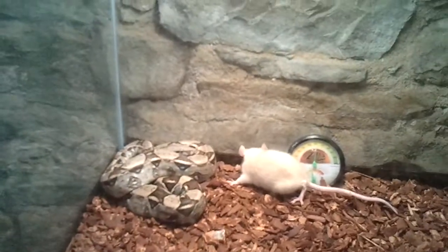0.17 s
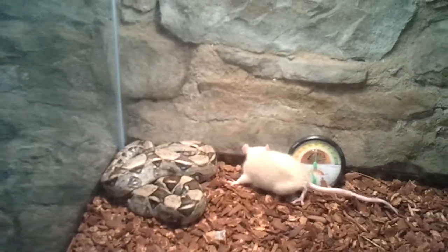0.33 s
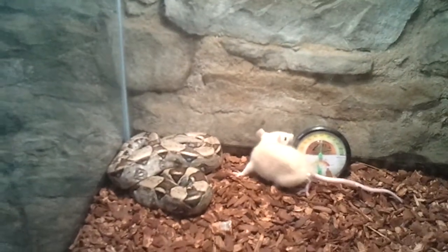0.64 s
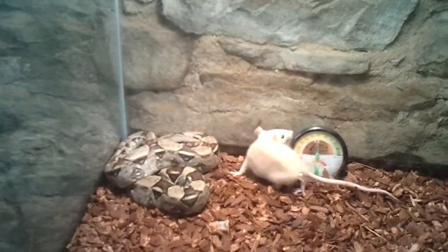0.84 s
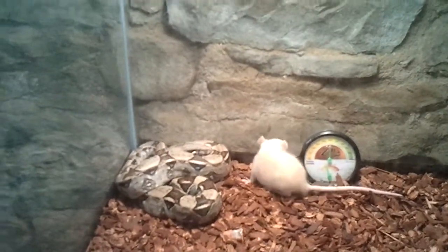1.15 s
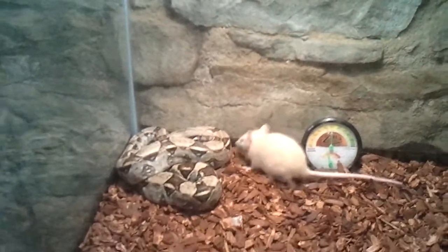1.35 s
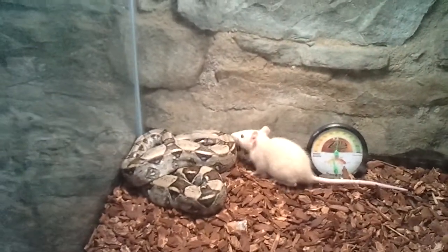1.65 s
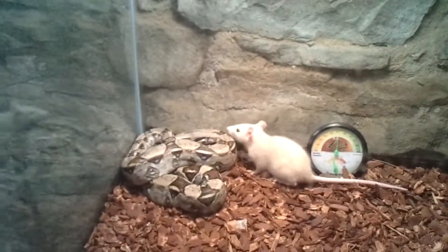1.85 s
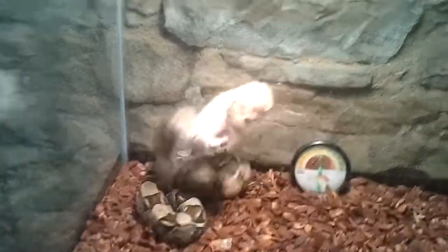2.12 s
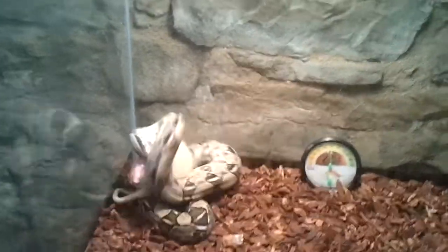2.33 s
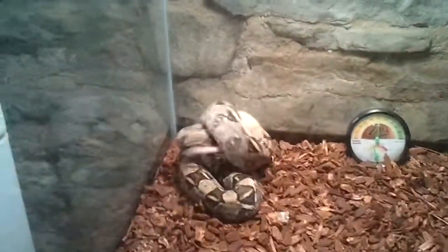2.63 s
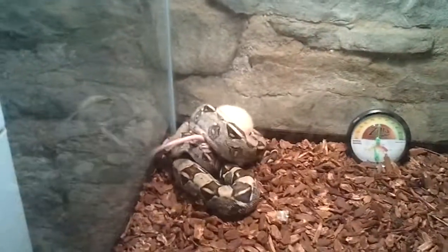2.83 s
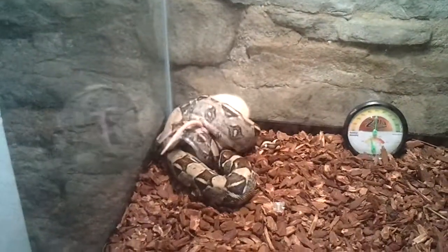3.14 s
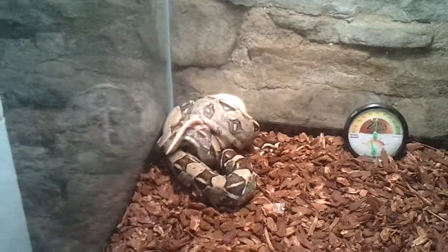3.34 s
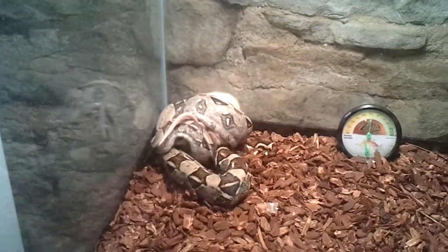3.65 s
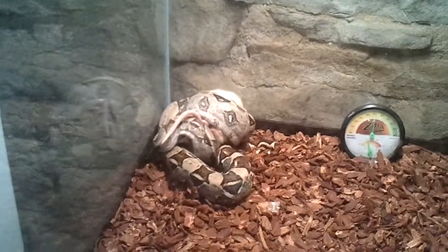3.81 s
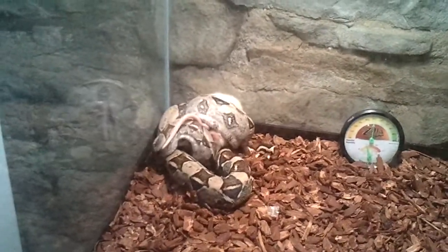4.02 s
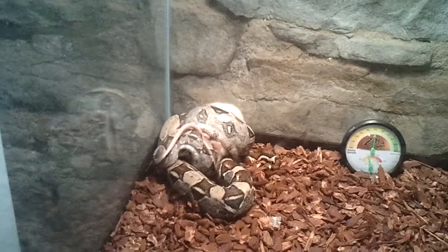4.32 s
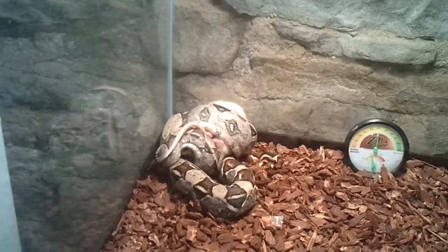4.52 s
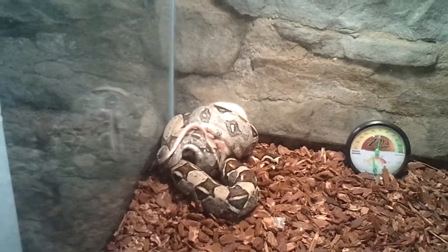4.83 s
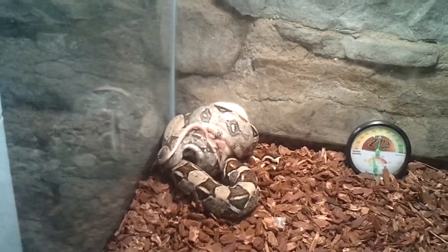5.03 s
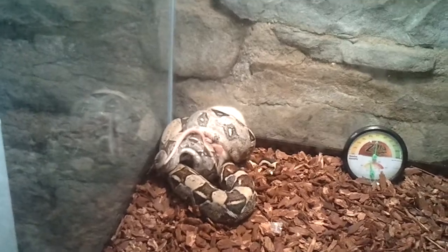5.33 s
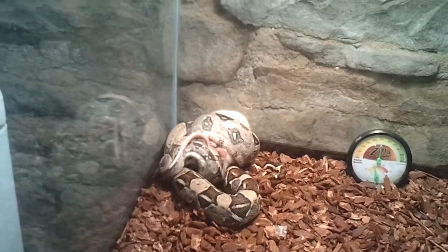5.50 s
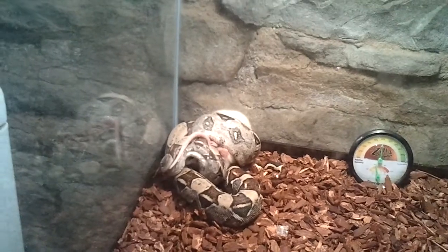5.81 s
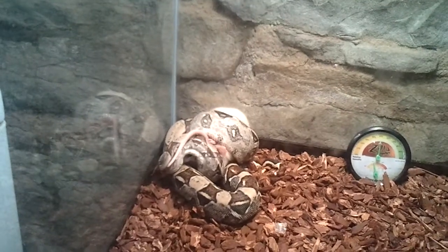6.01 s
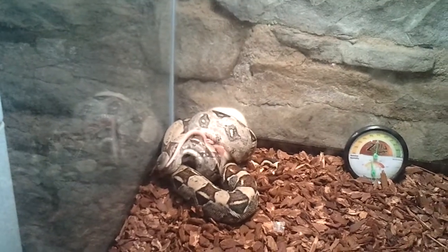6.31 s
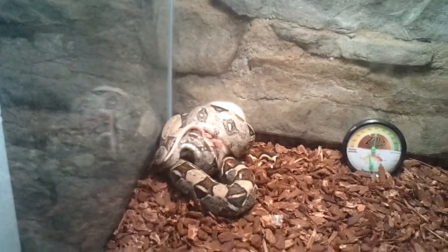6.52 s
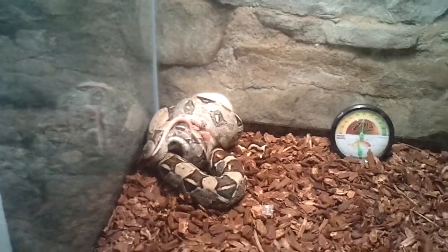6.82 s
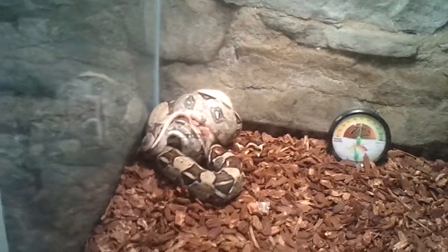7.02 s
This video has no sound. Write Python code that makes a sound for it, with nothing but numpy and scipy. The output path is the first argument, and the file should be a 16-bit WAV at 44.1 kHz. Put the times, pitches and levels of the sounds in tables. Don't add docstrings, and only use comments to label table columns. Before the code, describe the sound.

A seized rat squeals and screams in a small glass enclosure, weakening to a hoarse wheeze over steady hum, with one loud dry click near the end.

```python
import sys
import numpy as np
from scipy import signal
from scipy.fft import rfft, irfft, next_fast_len
from scipy.io import wavfile
from scipy.ndimage import uniform_filter1d, minimum_filter1d

SR = 44100
rng = np.random.default_rng(int(sys.argv[2]) if len(sys.argv) > 2 else 0)


def dump_mix(stems):
    frames = np.atleast_2d(stems).T
    limited = np.clip(frames, -1, 1)
    pcm = np.round(limited * 32767).astype(np.int16)
    wavfile.write(sys.argv[1], SR, pcm)


def boost(x):
    u = np.asarray(x, float) / 20
    return 10 ** u


N = 315756
TIME_S = np.arange(N) / SR
MAINS_HZ, SAMPLING_HZ = 60, 16000

# (frequency [Hz], level [dB rms])
BUZZ_LINES = [(118.4, -68.5), (360.7, -63.5), (479.1, -71), (597.5, -68), (721.4, -76.5), (839.8, -68.5),
              (958.2, -64), (1023, -77.5), (1082, -79), (1200, -75.5), (1319, -77.5), (1378, -76),
              (1437, -76.5), (240, -75),
              (3122, -78.5), (3359, -77), (3418, -74.5), (4317, -75.5), (4382, -74.5), (4619, -73.5),
             (4678, -75), (4737, -77), (4802, -70), (4861, -73), (5222, -76), (5642, -80), (5879, -76.5),
             (6239, -77)]
# (frequency [Hz], level [dB rms])
FAINT_BUZZ = [(100, -89.5), (700, -89.5), (1100, -86), (1700, -92), (3000, -92.5), (4500, -93), (6000, -89),
              (8500, -95.5)]
# (frequency [Hz], density [dB per Hz])
HISS = [(18, -54), (30, -24.5), (113, -10.5), (340, -5.5), (1000, -10.5), (1900, -13.5), (4200, -15),
        (7900, -13)]
# (frequency [Hz], gain [dB])
HISS_EDGE = [(7900, 0), (8690, -20.5), (11300, -41), (19100, -107)]
HISS_TOP = [(hz, db + HISS[-1][1]) for hz, db in HISS_EDGE[1:]]
HISS_DB, STILL_HAND_DB = -54, -81
# (time [s], level [dB], swell [s])
HAND_JOLTS = [(0.48, -64, .05), (1.36, -66, 0.056), (1.95, -74, .08), (2.28, -61, 0.076), (2.42, -63, .08),
              (2.56, -66, .05), (2.77, -48.5, .04), (3.06, -65, 0.087), (3.49, -49, 0.04),
              (3.62, -64.5, .06), (3.95, -70, .12), (4.6, -75, .08), (5.9, -76, .2), (6.35, -77, .08),
              (6.82, -66, .06)]

# (start [s], length [s], level [dB])
BARK_DRAGS = [
    (1.22, .07, -60.5),
    (1.298, 0.022, -50),
    (1.335, 0.071, -56.5),
    (2.163, 0.16, -48.5),
    (2.34, 0.023, -44),
    (2.415, .04, -50),
    (2.538, .05, -48),
]
# (frequency [Hz], level [dB])
BARK_SPECTRUM = [(250, -5), (600, -4.5), (1300, -3.5), (2500, -8.5), (4500, -7), (6500, -0.5), (8000, -17)]
DRAG_RISE_S, DRAG_FALL_S = .012, .03

# (time [s], snap peak [dB], knock peak [dB], knock centre [Hz])
CLICKS = [(1.2965, -42, -50, 1300), (1.307, -43, -60, 1300), (1.3155, -36, -50, 1300),
          (1.3455, -52, -37, 1300), (3.692, -47, -43, 2000), (4.2718, -42, -33, 1000),
          (6.8195, -35, -50, 1300), (6.8243, -36, -60, 1300), (6.8263, -23, -30, 2000),
          (6.8276, -17.5, -20.5, 850), (2.4528, -27, -23, 2000), (2.4555, -26, -30, 2000),
          (2.4125, -36, -34, 1300), (2.297, -48, -38, 1600), (2.578, -48, -38, 1200)]
# (frequency [Hz], level [dB], t60 [s])
SNAP_MODES = [(3100, -7, .002), (4250, 5, .0025), (4700, 3, .002), (5550, 1, .0015), (6350, 4, .002),
              (7050, 1, .0015), (7650, 0, .002), (8300, -12, .002)]
# (frequency [Hz], level [dB], t60 [s])
KNOCK_MODES = [(180, -8, 0.015), (800, 2, 0.008), (1360, 5.5, 0.0036), (1940, 7, 0.0036)]

# (time [s], peak [dB], blow centre [Hz], push length [s])
BUMPS = [
    (2.173, -39.5, 146, 0.011),
    (2.178, -37.5, 800, 0.0027),
    (2.322, -37, 340, 0.005),
    (2.344, -33.5, 473, 0.019),
    (2.411, -29, 800, 0.0026),
    (2.453, -22, 637, 0.012),
    (2.57, -35.5, 940, 0.0084),
    (2.583, -44.5, 403, 0.021),
]
# (frequency [Hz], level [dB], t60 [s])
PANE_MODES = [(146, 2.5, 0.32), (196, 3, 0.3), (280, -5, 0.077), (387, 1, 0.2), (469.6, -4, 0.066),
              (587.5, 0, 0.11), (660, -9, 0.12), (802, -5.5, 0.13), (1060, -8.5, 0.047), (1396, 5.5, 0.045),
              (2205, 5.5, .05)]

# (time [s], pitch [Hz], effort [dB], rasp over whistle [dB], bright over dull rasp [dB])
SEIZED = [
    [(2.225, 3360, -48, 8, -10), (2.24, 3210, -50, -5, 4), (2.262, 3450, -46.5, -10, 19),
     (2.272, 3000, -48, 1, 5), (2.285, 2704, -43, 1, 6), (2.297, 2700, -45, -2, -12),
     (2.31, 3400, -48, -13, 8), (2.322, 3400, -48, -3, 0.1)],
    [(2.331, 3900, -37.5, -2, -3), (2.338, 3703, -34.5, -3, -12), (2.343, 3060, -35.5, -7, -2),
     (2.368, 3120, -40, -6, -5), (2.395, 3060, -61, 4, 1)],
    [(2.407, 3683, -30.5, -18, -6), (2.412, 3551, -36.5, -4, -4), (2.424, 3152, -30, -2.5, -4),
     (2.437, 3030, -40, -5, 0), (2.45, 3099, -42, 3, -4), (2.457, 3144, -33, -4, -5),
     (2.472, 3100, -51, 4, -6), (2.49, 2850, -50, 6, 3)],
]
SCREAMS = [
    [(2.527, 3000, -47, 16, -8), (2.54, 2995, -40, 2, 13), (2.555, 3300, -31, 0.5, 0),
     (2.572, 3500, -37, 1.5, 0), (2.59, 3000, -57, 11, -10), (2.61, 3002, -55, 17, 6)],
    [(2.694, 3290, -42, 22, -3), (2.709, 3300, -27.5, 9.1, 7), (2.722, 3400, -18.5, 8.8, 6),
     (2.742, 3700, -17.5, 1, 6), (2.757, 4600, -15, 1.4, -1.5), (2.772, 4950, -15.5, 0.1, -1),
     (2.786, 4600, -15.5, 0.82, -0.5), (2.8, 4700, -27.5, 17, -2), (2.825, 5022, -37, 6, 14)],
    [(2.937, 4600, -40, 10, 0.1), (2.948, 4650, -26.5, 1.5, 1.5), (2.97, 4715, -22, 1.5, 6.5),
     (2.99, 4620, -25, 0.5, 2), (3.012, 4660, -21.5, -3, 1.5), (3.035, 4620, -27.5, 7, -0.5),
     (3.12, 4610, -30, 8, -1.5), (3.138, 4500, -37, 19, -1), (3.155, 4400, -53, -3, -9)],
]
GRIPPED = [
    [(3.342, 2400, -44, -4, -2), (3.35, 2900, -48, 13, -10), (3.36, 2700, -47, 4, -13),
     (3.37, 2700, -64, 8, 0.1)],
    [(3.462, 3550, -37, -15, 0.1), (3.468, 3500, -40.5, -2, 10), (3.478, 3070, -43, -16, 3.1),
     (3.49, 3390, -41.5, -18, 3), (3.52, 3490, -38, -0.5, 3.2), (3.53, 3240, -42.5, -15, 2),
     (3.556, 3370, -39, -6, 0.1), (3.563, 3880, -35, -10, 6)],
    [(3.565, 3880, -38, -1, 1), (3.59, 3800, -34.5, 1, -2), (3.603, 4400, -33.5, 3.5, -7),
     (3.62, 4650, -31, 8, -4), (3.642, 4400, -30.5, 19, -12), (3.655, 4300, -56, 6, -11),
     (3.675, 4296, -62, 2, 4)],
]
WEAKER = [
    [(3.836, 3400, -51, 18, -1), (3.846, 3101, -44, -5, -3), (3.862, 2850, -40, 9, -5),
     (3.895, 2950, -34, 5, -5), (3.92, 2850, -37.5, 16, -5), (3.972, 3000, -41.5, 13, -5),
     (3.99, 3000, -49, 6, -6)],
    [(4.0, 3400, -52, 5, -5), (4.02, 3900, -47, 18, -5), (4.032, 3900, -39.5, 0, -1),
     (4.05, 3560, -42.5, -1, -5), (4.066, 3100, -38.5, 5, -13), (4.082, 2975, -50, 17, -12),
     (4.092, 3200, -57, 2, -3)],
]
LAST = [
    [(4.716, 3250, -58, -2, -2), (4.728, 3020, -50, -4, 1), (4.742, 2930, -41, -13, 1),
     (4.762, 2920, -43, -8, -4), (4.773, 2900, -44, -6, 4), (4.779, 3340, -41, -1, 10),
     (4.792, 3300, -40, 5, 4), (4.797, 3250, -39, 14, 4)],
    [(4.798, 1260, -39, 14, 5), (4.81, 1240, -37.5, 14, 3), (4.842, 1200, -38.5, 13, 2),
     (4.852, 1400, -38.5, 14, 6), (4.877, 1300, -40, 17, -1), (4.888, 1300, -56, 10, 0.1)],
]
# (roughness [0-1], overtone over whistle [dB], chest over rasp [dB])
VOICES = [(0.84, -12, -8.5), (0.4, -7, -3), (0.9, -2, -3.5), (.95, -8, -12), (0.99, -35, -19.5),
          (0.84, -38, -13), (0.85, -12, -2.5), (0.53, -8, -12.5), (0.45, -13, -11.5), (0.83, -12, -10),
          (0.73, -6, -9), (0.63, -9, -14), (0.53, -10, -18)]
ROUGH_PER_LEAK_DB, ROUGH_PER_FADE_DB = .012, .006
OVERTONE_PER_GAPE = 0.94
# (frequency [Hz], level [dB])
DULL_RASP = [(1900, -24), (2300, -6), (2900, -3), (3600, 0), (4500, 1), (5200, -0.5), (5800, 2.5),
             (6400, -25)]
# (frequency [Hz], level [dB])
BRIGHT_RASP = [(5100, -40.5), (5800, 7), (7000, 9), (7800, 5.5), (8600, -9.5)]
# (frequency [Hz], width [Hz], level [dB])
THROAT_RIDGES = [(2380, 100, -0.7), (2920, 230, -4), (4560, 300, -4)]
# (frequency [Hz], level [dB])
FREE_CHEST = [(220, -36), (340, -15), (520, -8.5), (850, -2), (1250, -6), (1900, -1), (2200, -4),
              (2600, -27.5)]
# (frequency [Hz], level [dB])
SQUEEZED_CHEST = [(220, -30), (340, -10), (550, -8.5), (880, -3), (1150, -8), (1500, -3), (1850, -10),
                  (2300, -21.5)]
GRIPPED_S, RASP_DB = 3.3, -1
# (start [s], length [s], from [Hz], to [Hz], level [dB rms])
STRANDS = [(2.255, 0.035, 7200, 5700, -58.2), (2.273, 0.024, 2900, 2650, -45.6),
           (2.33, 0.035, 5800, 6400, -45.9), (2.33, 0.015, 3900, 3700, -41.1),
           (2.407, 0.014, 7400, 7300, -44.3), (2.43, 0.026, 6200, 6100, -42.7),
           (2.45, 0.014, 2100, 2000, -42.7), (2.7, 0.045, 1850, 1950, -39.8),
           (2.755, 0.045, 1900, 1900, -38.8), (2.716, 0.03, 6900, 6800, -29.9),
           (2.728, 0.028, 3450, 3600, -28.2), (2.76, 0.024, 5090, 5090, -16.6),
           (2.764, 0.026, 4490, 4490, -22.8), (2.764, 0.018, 950, 950, -42.2),
           (2.944, 0.028, 1400, 1400, -42.9), (2.95, 0.026, 6500, 6550, -32.9),
           (2.99, 0.042, 7050, 7050, -33.0), (2.98, 0.14, 1940, 1940, -50.2), (2.96, 0.12, 880, 850, -45.3),
           (3.86, 0.11, 4600, 4500, -48.2), (3.855, 0.105, 2900, 2880, -44.4),
           (3.9, 0.05, 2420, 2400, -48.0), (3.86, 0.09, 940, 930, -51.0), (4.028, 0.016, 3880, 3750, -45.2),
           (4.042, 0.015, 5290, 5290, -47.9), (4.04, 0.027, 7100, 7030, -52.3),
           (4.058, 0.015, 1380, 1380, -51.4), (4.068, 0.018, 4300, 4300, -48.3),
           (4.722, 0.05, 6300, 5800, -65.6), (4.769, 0.027, 6100, 7050, -45.7),
           (4.797, 0.088, 7150, 7300, -48.1), (4.785, 0.065, 4900, 4860, -49.4),
           (4.79, 0.06, 2420, 2400, -58.8), (4.85, 0.036, 2700, 3000, -52.4)]
STRAND_WIDTH_HZ, STRAND_ROUGH, STRAND_EDGE_S, STRANDS_DB = 170, .65, .007, -0.5
# (time [s], gain over voice [dB])
HARD_SLAPS = [(2.7171, 6.5), (2.721, 1.5), (2.7268, 4.5), (2.7315, 2.5), (2.7377, 5), (2.7466, 11),
              (2.7588, 3), (2.7678, 8), (2.773, 7), (2.783, 9.5), (2.7858, 2.5), (2.7913, 5), (2.8127, 6),
              (2.818, 4), (2.9516, 1.5), (2.966, 6.5), (2.9719, 4), (2.9796, 4.5), (2.9852, 4), (3.0023, 3),
              (3.0092, 3), (3.0274, 4.5), (3.0337, 5), (3.0376, 2)]
SLAP_S = .0006

# (frequency [Hz], t60 [s])
GLASS_T60 = [(300, 0.31), (1500, 0.13), (3200, 0.15), (5000, 0.17), (8000, 0.12)]
# (frequency [Hz], level [dB], t60 [s])
STANDING_WAVE = [(5085, 0, .16)]
LIMIT_PEAK, OVERLOAD_PEAK = .724, .71


def evened(x):
    return x / np.sqrt(np.mean(x ** 2) + 1e-20)


def read(points, hz):
    f, value = np.transpose(points)
    return np.interp(np.log(hz + 1), np.log(f + 1), value)


def colour(x, points):
    size = next_fast_len(len(x))
    gain = boost(read(points, np.fft.rfftfreq(size, 1 / SR)))
    return evened(irfft(rfft(x, size) * gain, size)[:len(x)])


def drift(seconds):
    size = max(int(seconds * SR), 1)
    once = uniform_filter1d(rng.standard_normal(N), size)
    return evened(uniform_filter1d(once, size))


def buzz():
    k = np.arange(2, 141)
    db = read(FAINT_BUZZ, k * MAINS_HZ) + 6.54 * rng.standard_normal(len(k))
    for hz, line_db in BUZZ_LINES:
        db[round(hz / MAINS_HZ) - 2] = line_db
    period_s = TIME_S[:SR // MAINS_HZ]
    turns = np.outer(k * MAINS_HZ, period_s) + rng.random((len(k), 1))
    cycle = boost(db) @ np.cos(2 * np.pi * turns)
    return np.sqrt(2) * np.resize(cycle, N) * boost(.7 * drift(.2))


def floor():
    hiss_db = HISS_DB - 2.5 + 0.17 * drift(.15)
    hiss = boost(hiss_db) * colour(rng.standard_normal(N), HISS + HISS_TOP)
    rumble = colour(rng.standard_normal(N), [(20, -14.0), (35, -5), (60, 0), (90, 0.0), (140, -30.0)])
    s, db, swell_s = np.transpose(HAND_JOLTS)[:, :, None]
    t = TIME_S[::64]
    jolts = (boost(db) * np.exp(-.5 * ((t - s) / swell_s) ** 2)).sum(0)
    hand = boost(STILL_HAND_DB) + np.interp(TIME_S, t, jolts)
    return hiss + boost(-6.5) * hand * rumble


def bark():
    start_s, length_s, db = np.transpose(BARK_DRAGS)[:, :, None]
    t = TIME_S[::64] - start_s
    rise = np.minimum(t / DRAG_RISE_S, 0)
    fall = np.maximum(t - length_s, 0) / DRAG_FALL_S
    drags = boost(db) * np.exp(rise - fall)
    sizes = (rng.random(N) < 1500 / SR) * boost(3.0 * np.minimum(rng.exponential(1, N), 4))
    bursts = signal.lfilter([1], [1, -np.exp(-1 / (0.0011 * SR))], sizes)
    grains = bursts * rng.standard_normal(N)
    return np.interp(TIME_S, TIME_S[::64], drags.max(0)) * colour(grains, BARK_SPECTRUM)


def ring(modes, weight=1, rise_s=1e-4, phase=0):
    hz, db, t60_s = np.transpose(modes)[:, :, None]
    t, rise_s = TIME_S[:12000], max(rise_s, 1e-4)
    dying = boost(db - 60 * np.maximum(t - rise_s, 0) / np.maximum(t60_s, .001))
    sines = np.sin(2 * np.pi * (hz * t + phase))
    return np.minimum(t / rise_s, 1) * (weight * dying * sines).sum(0)


def nearness(modes, hz, octaves):
    return 1 / (1 + (np.log2(np.array(modes)[:, :1] / hz) / octaves) ** 2)


def add(mix, s, db, sound):
    part = mix[round(s * SR):][:len(sound)]
    part += boost(db) * sound[:len(part)] / abs(sound).max()


def clicks():
    out = np.zeros(N)
    phases = rng.random((len(CLICKS), 2, len(SNAP_MODES), 1))
    for (s, snap_db, knock_db, hz), phase in zip(CLICKS, phases):
        snap = ring(SNAP_MODES, 1, 0.0018, phase[0])
        near = nearness(KNOCK_MODES, hz, 0.85)
        knock = ring(KNOCK_MODES, near, 0.00071, phase[1, :len(KNOCK_MODES)])
        add(out, s - .0009, snap_db, snap[:900])
        add(out, s - .0006, knock_db, knock[:900])
    return out


def panes():
    out = np.zeros(N)
    phases = rng.random((len(BUMPS), len(PANE_MODES), 1))
    for (s, db, hz, push_s), phase in zip(BUMPS, phases):
        add(out, s, db, ring(PANE_MODES, nearness(PANE_MODES, hz, .5), push_s, phase))
    return out


def curves(tables, fade_s):
    s, *columns = np.transpose(sorted(np.vstack(tables).tolist()))
    gate = sum((TIME_S >= rows[0][0]) & (TIME_S < rows[-1][0]) for rows in tables) > 0
    return uniform_filter1d(gate * 1., int(fade_s * SR)), [np.interp(TIME_S, s, c) for c in columns]


def share_db(rival_db):
    return 10 * np.log10(1 + boost(rival_db) ** 2)


def voice_controls():
    calls = []
    for rows, voice in zip(SEIZED + SCREAMS + GRIPPED + WEAKER + LAST, VOICES):
        top_db = max(row[2] for row in rows)
        calls.append(np.column_stack([rows, np.tile([*voice, top_db], (len(rows), 1))]))
    gate, columns = curves(calls, .01)
    hz, effort_db, leak_db, gape_db, rough, over_db, chest_db, top_db = columns
    whistle_db = effort_db - share_db(leak_db)
    rasp_db = effort_db - share_db(-leak_db)
    rough = rough + ROUGH_PER_LEAK_DB * leak_db - ROUGH_PER_FADE_DB * (top_db - effort_db)
    overtone_db = whistle_db + over_db + OVERTONE_PER_GAPE * gape_db
    dull_db, bright_db = rasp_db - share_db(gape_db), rasp_db - share_db(-gape_db)
    return gate, (hz, rough, whistle_db, overtone_db, dull_db, bright_db, rasp_db + chest_db)


def scattered(rough):
    narrow = drift(.0022) + 1j * drift(.0022)
    wide = drift(.0006) + 1j * drift(.0006)
    share = rough ** 4
    scatter = ((1 - share) * narrow + share * wide) / np.hypot(1 - share, share) / np.sqrt(2)
    return np.sqrt(2) * (np.sqrt(1 - rough) + np.sqrt(rough) * scatter)


def throat(x):
    ridges = [boost(db) * signal.lfilter(*signal.iirpeak(hz, hz / width_hz, SR), x)
              for hz, width_hz, db in THROAT_RIDGES]
    return evened(x + sum(ridges))


def rat():
    gate, controls = voice_controls()
    hz, rough, whistle_db, overtone_db, dull_db, bright_db, chest_db = controls
    rough = np.clip(rough, 0, 1)
    turn = 2 * np.pi * np.cumsum(hz * (1 + 0.00698 * drift(.004))) / SR
    second = scattered(rough ** .75) * np.exp(2j * turn)
    third_gain = boost(1.5) * np.clip((3 * hz - 9300) / 300, 0, 1) * (1 - rough)
    third = third_gain * scattered(np.sqrt(rough)) * np.exp(3j * turn)
    first = boost(whistle_db) * scattered(rough) * np.exp(1j * turn)
    whistle = (first + boost(overtone_db) * (second + third)).real
    slaps = (rng.random(N) < 600 / SR) * boost(2.2 * rng.standard_normal(N))
    puffs = signal.lfilter([1], [1, -np.exp(-1 / (.0012 * SR))], slaps) + 1.05
    air = uniform_filter1d(puffs, size=25) * rng.standard_normal((3, N))
    dull = boost(dull_db) * throat(colour(air[0], DULL_RASP))
    bright = boost(bright_db) * colour(air[1], BRIGHT_RASP)
    chest = np.where(TIME_S < GRIPPED_S, colour(air[2], FREE_CHEST), colour(air[2], SQUEEZED_CHEST))
    return gate * (whistle + boost(RASP_DB) * (dull + bright) + boost(chest_db) * chest)


def strands():
    out = np.zeros(N)
    pole = np.exp(-np.pi * STRAND_WIDTH_HZ / SR)
    noises = rng.standard_normal((len(STRANDS), 2, 9000))
    for (s, length_s, from_hz, to_hz, db), (a, b) in zip(STRANDS, noises):
        t = TIME_S[:min(int(length_s * SR), 8000)]
        scatter = signal.lfilter([1], [1, -2 * pole, pole ** 2], a + 1j * b)[-len(t):]
        scatter /= np.sqrt(np.mean(abs(scatter) ** 2))
        turn = 2 * np.pi * np.cumsum(np.linspace(from_hz, to_hz, len(t))) / SR
        wobble = np.sqrt(1 - STRAND_ROUGH) + np.sqrt(STRAND_ROUGH) * scatter
        line = (wobble * np.exp(1j * turn)).real
        edges = np.clip(np.minimum(t, length_s - t) / STRAND_EDGE_S, 0, 1)
        out[round(s * SR):][:len(t)] += boost(db + STRANDS_DB) * evened(line) * edges
    return out


def slapping():
    s, db = np.transpose(HARD_SLAPS)[:, :, None]
    t = TIME_S[::8]
    spikes_db = (db * np.exp(-((t - s) / SLAP_S) ** 2)).sum(0)
    return np.interp(TIME_S, t, boost(spikes_db))


def enclosure():
    taps = np.zeros(SR // 2)
    at = np.arange(100, len(taps) - 20, 20)
    taps[at + rng.integers(0, 20, len(at))] = rng.choice([-1., 1.], len(at))
    hz, t, z = signal.stft(taps, SR, nperseg=256)
    t60_s = np.maximum(read(GLASS_T60, hz), .02)[:, None]
    tail = signal.istft(z * boost(-60 * t / t60_s), SR, nperseg=256)[1]
    waves = ring(STANDING_WAVE)
    standing = boost(-17) * waves / np.linalg.norm(waves)
    return tail[:len(waves)] / np.linalg.norm(tail) + standing


def scene():
    rest = buzz() + floor() + clicks() + panes()
    animal = (bark() + rat() + strands()) * slapping()
    echo = signal.fftconvolve(animal, enclosure())[:N]
    return (animal + boost(-5.5) * echo + rest)[None]


def limiter(x):
    peak = -minimum_filter1d(-abs(x), size=161)
    gain = uniform_filter1d(np.minimum(LIMIT_PEAK / (peak + 1e-9), 1), size=75)
    return x * uniform_filter1d(gain, size=75)


def low_pass(x):
    return signal.sosfilt(signal.butter(12, 15800, fs=SR, output="sos"), x)


def record(dry):
    highpass = signal.firwin(255, [8800, 13000], pass_zero=False, fs=SR)[None]
    above = signal.oaconvolve(dry, highpass, "same")
    folded = dry + 2 * np.cos(2 * np.pi * SAMPLING_HZ * TIME_S) * above
    band = signal.firwin(301, 8750, window=("kaiser", 12), fs=SR)[None]
    limited = limiter(signal.oaconvolve(folded, band, "same"))
    overloaded = np.clip(limited, -OVERLOAD_PEAK, OVERLOAD_PEAK)
    return low_pass(overloaded)


dry = scene()
out = record(dry)
dump_mix(out)
```